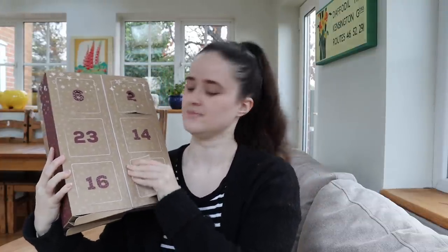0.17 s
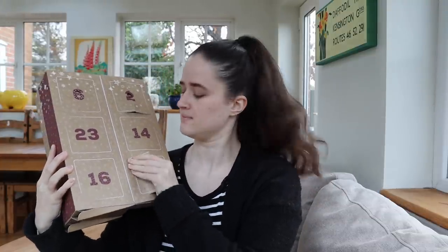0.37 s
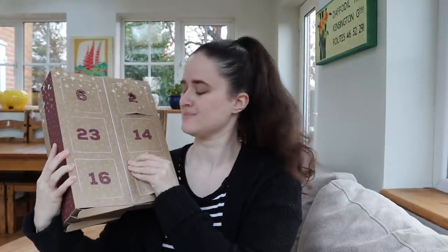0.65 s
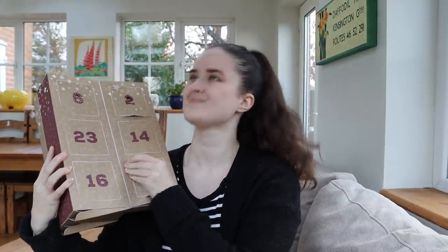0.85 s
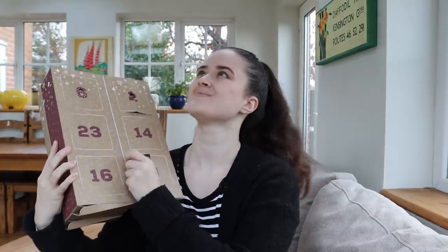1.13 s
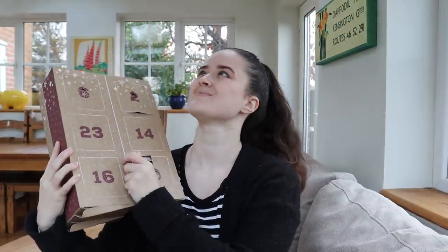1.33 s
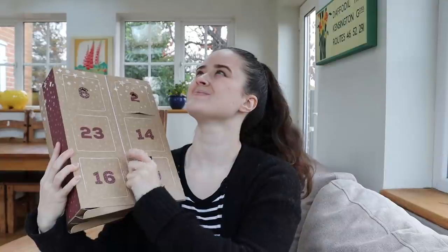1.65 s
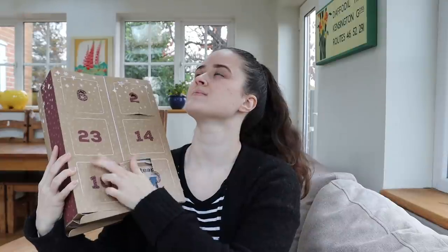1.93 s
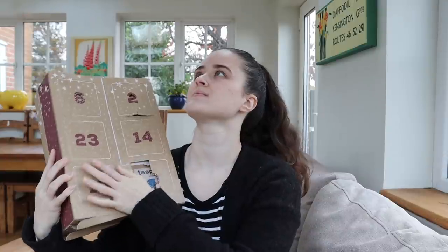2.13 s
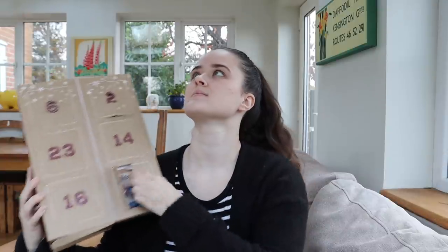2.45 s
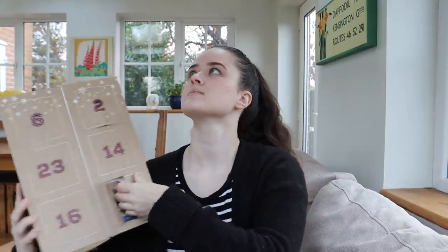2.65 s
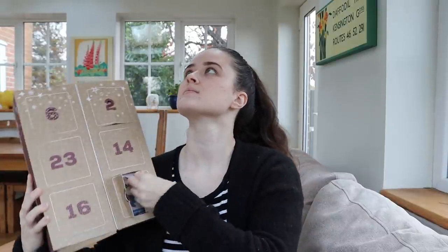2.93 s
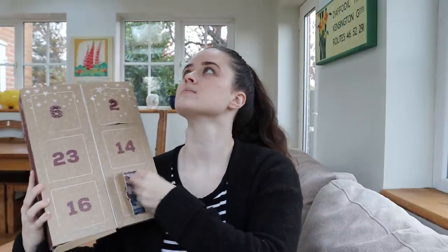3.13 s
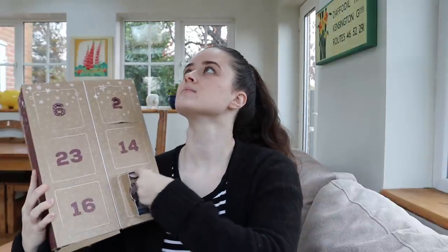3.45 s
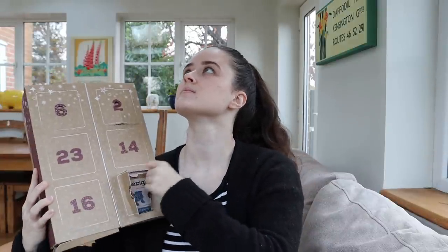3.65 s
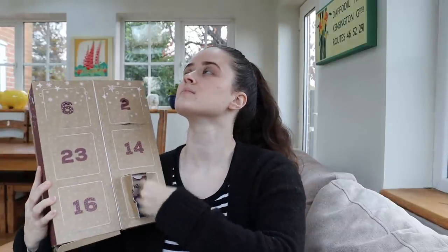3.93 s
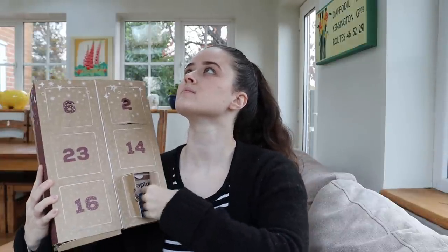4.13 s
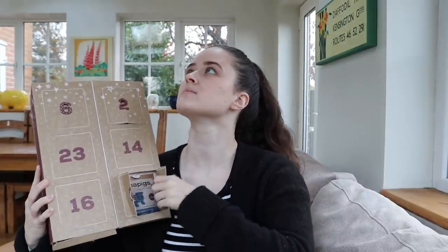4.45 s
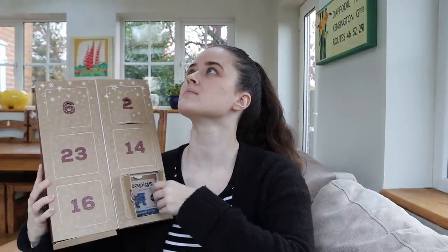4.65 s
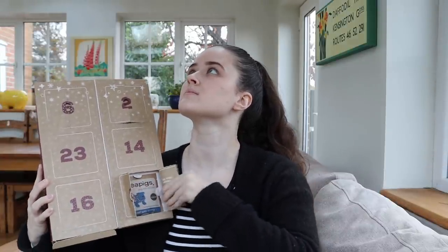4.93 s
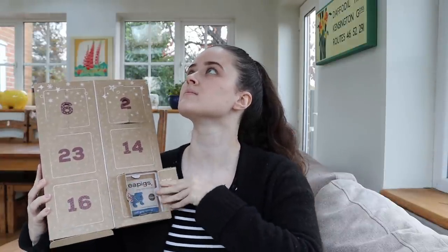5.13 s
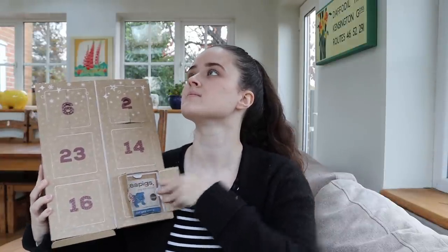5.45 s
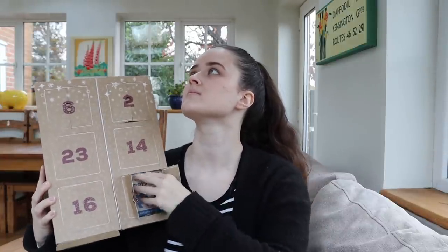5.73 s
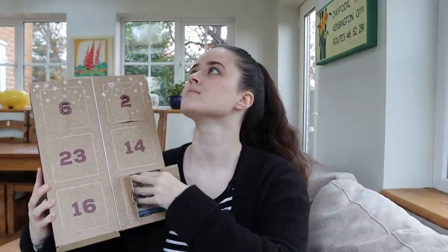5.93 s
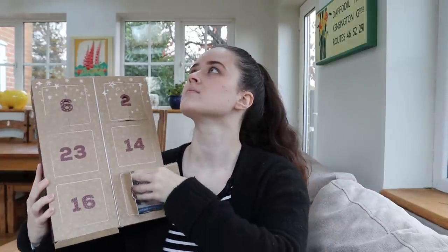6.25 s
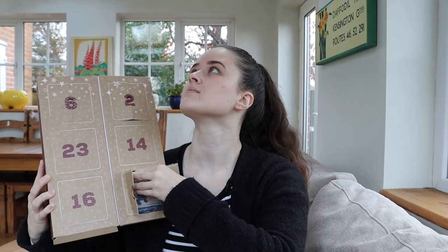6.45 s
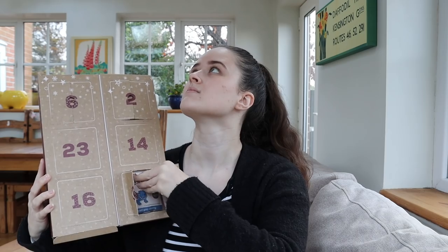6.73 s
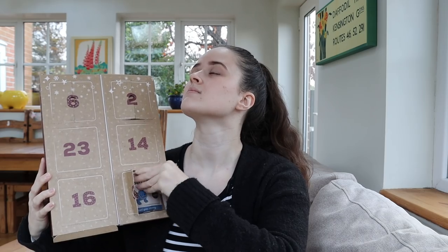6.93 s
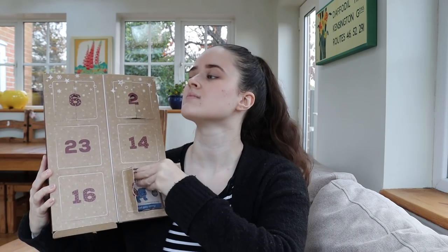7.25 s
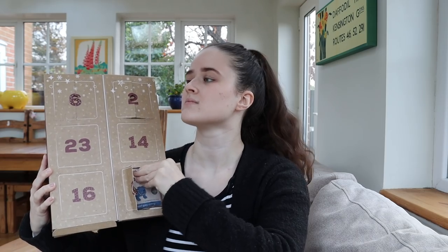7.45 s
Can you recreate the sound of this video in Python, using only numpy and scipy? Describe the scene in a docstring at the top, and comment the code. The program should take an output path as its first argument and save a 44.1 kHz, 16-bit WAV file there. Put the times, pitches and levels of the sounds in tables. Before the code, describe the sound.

Fingers pick at a stuck cardboard flap, with irregular scratching, rubbing and sharp little snaps of card in a room.

```python
"""Fingers pick and prise at a stuck flap of a cardboard box, a metre away in a lively room.
First the fingers rub and tick lightly on the card, a stick-slip friction; near 1 s the nail slips off
the edge and the flap snaps, an impulse that rings the modes of the hollow box. Runs of snaps follow,
with rubbing and quick drags between, hardest near 4.4 s and 4.9 s, then thinning out towards 7.6 s.
After each sound the nearby walls reflect it and the room reverberates for half a second."""
import sys
import numpy as np
from scipy import signal
from scipy.fft import rfft, irfft
from scipy.io import wavfile
from scipy.ndimage import uniform_filter1d

SR = 44100
rng = np.random.default_rng(int(sys.argv[2]) if len(sys.argv) > 2 else 0)


def file_out(sig):
    """Save sig as 16-bit WAV at sys.argv[1]."""
    # one column per channel
    cols = np.atleast_2d(sig).T
    # limit, then scale
    lim = np.clip(cols, -1, 1)
    pcm = np.round(lim * 32767).astype(np.int16)
    wavfile.write(sys.argv[1], SR, pcm)


N = 334278


def gain_of(db):
    """Amplitude ratio of a level in decibels."""
    return 10 ** (np.asarray(db) / 20)


def unit_rms(x):
    """Normalisation to a mean power of 1."""
    return x / np.sqrt(np.mean(x ** 2) + 1e-20)


def unit_energy(x):
    """Normalisation to a total energy of 1."""
    return x / np.linalg.norm(x)


def curve_at(points, hz):
    """Interpolation on a logarithmic frequency axis."""
    f, value = np.transpose(points)
    return np.interp(np.log(hz + 1), np.log(f + 1), value)


def ring(modes, size=3000):
    """Modal superposition: an impulse response is a sum of damped sines."""
    t = np.arange(size) / SR
    sines = (gain_of(db) * np.sqrt(width) * np.exp(-np.pi * width * t) * np.sin(2 * np.pi * hz * t)
             for hz, width, db in modes)
    return unit_energy(sum(sines))


def colour(points):
    """Minimum phase: the most compact causal response with a given spectrum."""
    spectrum_db = np.maximum(curve_at(points, abs(np.fft.fftfreq(4096, 1 / SR))), -100)
    log_response = np.conj(signal.hilbert(np.log(gain_of(spectrum_db))))
    return unit_energy(np.fft.ifft(np.exp(log_response)).real[:1024])


def resonate(x, hz, width_hz):
    """Resonance by heterodyning: shift hz down to zero, smooth, and shift back."""
    carrier = np.exp(2j * np.pi * hz * np.arange(1, len(x) + 1) / SR)
    pole = np.exp(-np.pi * width_hz / SR)
    return 2 * (carrier * signal.lfilter([1 - pole], [1, -pole], x / carrier + 1e-18)).real


def grains(per_s, spread_db):
    """Shot noise: independent clicks of uneven size."""
    odds, sign, size = rng.random((3, N))
    return unit_rms((odds < per_s / SR) * (sign - .5) * gain_of(-spread_db * np.log(size + 0.041)))


# Likeness of left and right in a diffuse field: frequency_hz, coherence (-1 to 1)
COHERENCE = [(60, .98), (300, .93), (700, .7), (1500, .35), (3000, .05), (7000, -.1), (15000, .03)]

def diffuse_pair(a, b):
    """Spatial coherence: long waves reach both microphones alike, short waves independently."""
    coherence = curve_at(COHERENCE, np.fft.rfftfreq(len(a), 1 / SR))
    mid = rfft(a) * np.sqrt((1 + coherence) / 2)
    side = rfft(b) * np.sqrt((1 - coherence) / 2)
    return irfft(np.array([mid + side, mid - side]), len(a))


# Spectrum of the quiet room: frequency_hz, density_db
AIR_SPECTRUM = [(15, -38), (25, 1.5), (70, 6.5), (280, 1), (368, -8.5), (457, -1), (952, 1.5), (1320, -0.5),
                (1930, -6), (3410, -6.5), (9330, -19.5), (14800, -20), (16500, -44)]

def room_tone():
    """Stationary noise: quiet air and microphone hiss."""
    density = gain_of(curve_at(AIR_SPECTRUM, np.fft.rfftfreq(N, 1 / SR)))
    noise = irfft(rfft(rng.standard_normal((2, N))) * density, N)
    return gain_of(-51.5) * unit_rms(diffuse_pair(*noise))


# Reverberation by band: frequency_hz, t60_s, level_db (re direct sound)
REVERB_BANDS = [(120, 0.18, 1), (330, 0.37, 5.5), (854, 0.44, 2.5), (2220, 0.54, 0), (5900, 0.46, -1.5),
                (13000, 0.22, -0.5)]

def reverberant_tail():
    """Absorption: dense reflections decay exponentially, each band at its own rate."""
    hz, t, noise = signal.stft(rng.standard_normal((2, SR)), SR, nperseg=256)
    bands = np.array(REVERB_BANDS)
    decay = gain_of(-60 * t / curve_at(bands[:, :2], hz)[:, None])
    decay /= np.sqrt((decay ** 2).sum(1, keepdims=True) * 128)
    level = gain_of(curve_at(bands[:, ::2], hz))[:, None]
    tail = signal.istft(noise * decay * level, SR, nperseg=256)[1][:, :SR]
    build_up = np.clip((np.arange(SR) / SR - .003) / 0.0065, 0, 1)
    return diffuse_pair(*tail * build_up)


# Echoes from nearby walls and furniture: delay_s, level_db, right_lag_s
WALL_ECHOES = [(.0033, -5.5, -.0001), (.0066, -8.5, 0.0004), (0.0134, -14.5, -0.0006),
               (0.0191, -26.5, -.00015)]

def reflections(x, shift_hz=3.1):
    """Multipath propagation: distinct echoes, then a tail that varies as box and hands shift."""
    early = np.zeros((2, 1024))
    for delay, db, lag in WALL_ECHOES:
        early[[0, 1], [round(delay * SR), round((delay + lag) * SR)]] = gain_of(db)
    out = signal.oaconvolve(x[None], early, axes=1)[:, :N]
    phase = 2 * np.pi * shift_hz * np.arange(N) / SR
    for k in range(4):  # four tails fade into each other
        share = np.maximum(np.cos(phase - k * np.pi / 2), 0)
        out += signal.fftconvolve((x * share)[None], reverberant_tail(), axes=1)[:, :N]
    return out


def follow_through(level_db=-27, t60_s=0.49):
    """Exponential relaxation: rubbing power jumps at each snap and fades as the finger scrapes on."""
    kicks = np.zeros(N)
    for start_s, snap_db, *_ in FLAP_SNAPS:
        kicks[round(start_s * SR)] = gain_of(snap_db + level_db) ** 2
    return signal.lfilter([1], [1, -gain_of(-60 / t60_s / SR) ** 2], kicks)


# Modes of the box, and low modes of its panels: pitch_hz, width_hz, level_db
BOX_MODES = [(563, 38, 17.5), (780, 68, 13), (990, 100, -19), (1032, 27, 9), (1390, 49, 7), (1638, 167, 13),
             (1988, 135, 18.5), (2096, 49, -3.5), (2750, 76, -6), (3250, 400, -28)]
PANEL_MODES = [(136, 19, -4), (213, 39, 0.5), (247, 45, -5), (368.4, 78, 6)]
# Spectra of rubbed card, of the nail's bite, and of skin hiss and ticks: frequency_hz, density_db
CARD_SPECTRUM = [(210, -33.5), (350, -11.5), (662, -6), (942, -3.5), (1400, -6), (1920, -1.5), (2600, -13),
                 (3380, -23.5), (5720, -120)]
NAIL_SPECTRUM = [(1350, -45), (2300, 5), (3160, 1.5), (3500, 4.5), (5200, -6.5), (6760, -37.5),
                 (11400, -120)]
HISS_SPECTRUM = [(2350, -26.5), (4000, -0.5), (4580, -5), (6060, -2), (9450, -9.5), (15000, -13.5),
                 (16000, -16), (16500, -13)]
# Fingers shifting on the card: time_s, pressure_db, hiss_trim_db, rumble_trim_db
FINGER_PRESSURE = [(0, -40, -9, -2.5), (.17, -54, -4, -2), (.29, -45.5, -2.5, -10), (.8, -65, -4, 6),
                   (.93, -58, -13, 3), (1.31, -42.5, -6.5, -16), (1.6, -63, -5, 6), (1.78, -40, -4, -11.5),
                   (2.09, -43.5, -7, 5.5), (2.45, -50, -2, -16), (3.03, -39, -9, 6), (3.36, -43.5, -9, -10),
                   (3.46, -48, -13, -8), (3.57, -42.5, -5.5, 7), (4.05, -44.5, -3, -11),
                   (4.24, -51, -7, -12), (4.7, -46, -3.5, -2.5), (4.9, -47.5, -14, -7),
                   (5.18, -43, -4.5, -18), (5.45, -55.5, -10, -11), (5.7, -36.5, -4, -8.5),
                   (6.28, -57.5, -29, 5.5), (6.9, -56.5, -6.5, 0), (7.12, -45.5, -12, -1),
                   (7.5, -61, -28, 5), (7.58, -44.5, -15, -3)]

def rubbing():
    """Stick-slip friction: fibres catch and let go in dense grains that excite the card and box."""
    times, *columns = np.transpose(FINGER_PRESSURE)
    pressure_db, hiss_db, rumble_db = (np.interp(np.arange(N) / SR, times, c) for c in columns)
    wobble, noise = rng.standard_normal((2, N))
    stutter_db = 1.3 * unit_rms(uniform_filter1d(uniform_filter1d(wobble, 300), 300))
    stroke = np.sqrt(gain_of(pressure_db) ** 2 + follow_through()) * gain_of(stutter_db)
    fibres = grains(per_s=2200, spread_db=4.4) * stroke
    skin = grains(per_s=5000, spread_db=2) * stroke
    body = gain_of(5) * colour(CARD_SPECTRUM) + gain_of(-4.5) * ring(BOX_MODES, size=1024)
    scrape = gain_of(-10.5) * signal.oaconvolve(fibres, body + colour(NAIL_SPECTRUM))
    hiss = signal.oaconvolve(skin * gain_of(hiss_db - 3), colour(HISS_SPECTRUM))
    rumble = signal.oaconvolve(noise * stroke * gain_of(rumble_db - 8), ring(PANEL_MODES))
    return scrape[:N] + hiss[:N] + rumble[:N]


# Quick drags of a nail: middle_s, half_length_s, level_db, pitch_hz, hiss_db (re level)
NAIL_DRAGS = [(0.994, 0.042, -31, 600, -16), (1.14, 0.076, -33.5, 1870, -6.5),
              (1.178, 0.023, -29.5, 1700, -10), (1.206, 0.048, -33, 3000, -9),
              (1.413, 0.035, -42.5, 1900, -6), (1.907, 0.031, -32.5, 1280, -14),
              (2.072, 0.053, -27, 1830, -3.5), (2.336, 0.039, -44, 2260, -2),
              (2.465, 0.0068, -37, 1510, -5), (2.514, 0.053, -38, 1200, -25), (2.84, 0.069, -52, 1300, -8),
              (3.286, 0.032, -47, 1200, 5.5), (3.53, 0.036, -36, 503, -2.5), (4.06, 0.16, -44.5, 1670, 2.5),
              (4.717, 0.069, -33.5, 1880, -14), (5.298, 0.021, -31, 1390, -14.5),
              (5.637, 0.032, -35, 2400, -11), (5.763, .04, -33, 3030, -0.5),
              (6.102, 0.089, -43.5, 1720, -7.5), (6.4, 0.065, -43.5, 950, -1),
              (7.014, 0.042, -29.5, 1280, -17), (7.134, 0.027, -33, 2100, -12.5),
              (7.387, 0.044, -54.5, 1500, -5)]

def drags():
    """Forced vibration: friction grains swell and fade through a broad resonance of the card."""
    out, t = np.zeros(N), np.arange(N) / SR
    fibres = grains(per_s=3500, spread_db=3.8)
    hiss = signal.oaconvolve(grains(per_s=4600, spread_db=1.9), colour(HISS_SPECTRUM))[:N]
    for middle_s, half_s, db, hz, hiss_db in NAIL_DRAGS:
        span = slice(round((middle_s - half_s) * SR), round((middle_s + half_s) * SR))
        swell = np.cos(np.pi / 2 * (t[span] - middle_s) / half_s) ** 2
        width_hz = 0.93 * hz
        rasp = unit_rms(resonate(resonate(fibres[span], hz, width_hz), hz, width_hz))
        out[span] += gain_of(db) * swell * (rasp + gain_of(hiss_db) * hiss[span])
    return out


def slip_force(noise, t, db):
    """Stress release: a ragged pulse; the harder the snap, the longer its rise and shorter its decay."""
    rise_s = 0.00017 * np.exp(0.25 * (db + 15))
    decay_s = np.clip(0.0048 * np.exp(-0.05 * (db + 21.5)), .0003, .02)
    envelope = np.exp(-t / decay_s) * (1 - np.exp(-t / rise_s))
    spectrum = rfft(noise * abs(noise) * envelope, 2048)
    return irfft(spectrum / abs(spectrum) ** 0.41)[:len(t)]  # a flatter spectrum: a clean, toneless click


def flap_response(hz, bends, detune=.04, mode_widening=1.15):
    """Sympathetic resonance: box modes near the flap's pitch ring, detuned a little and widened."""
    modes = [(f * (1 + detune * bend), mode_widening * width, db - 4.3 * np.log2(f / hz) ** 2)
             for (f, width, db), bend in zip(BOX_MODES, bends)]
    flap = ring([(hz, 160 + 0.015 * hz, 0)])
    ringing = gain_of(-0.5) * flap + gain_of(3.5) * ring(modes)
    low_cut = signal.butter(3, 0.7 * hz, "high", fs=SR)  # a small flap radiates little below its pitch
    return signal.lfilter(*low_cut, ringing)


# The nail slips and the card snaps: start_s, level_db, pitch_hz, bite_trim_db, tick_trim_db, thud_trim_db
FLAP_SNAPS = [(0.108, -42.5, 479, 2, -3, -28), (0.246, -37, 640, -20, -16, -8),
              (0.447, -37.5, 2880, -5, -5.5, -28), (.516, -27, 2910, -8, -9, -33),
              (.685, -34.5, 890, -1.5, -22, -9), (.731, -35.5, 2420, -4, -22, -21),
              (.756, -39, 950, 5, -13, -28), (.826, -21.5, 690, -2.5, -16, -5),
              (0.857, -17.5, 4440, -11, -11, -6), (.889, -18, 3100, -3, -10.5, -7),
              (.947, -3, 2080, -8, -23.5, -21.5), (1.06, -21, 1440, -3, -7, -29),
              (1.407, -21, 2960, -5.5, -15, -32), (1.75, -31, 958, 0, -20, -19),
              (1.792, -32, 2520, 1, -29, -28), (1.815, -27, 950, -3, -21, -27),
              (1.83, -23, 907, -5, -31, -28), (1.848, -9, 2300, -3.5, -20.5, -38),
              (1.967, -14.5, 3400, -4, -17.5, -28), (2.005, -19.5, 990, -11, -19, -15),
              (2.204, -30, 540, -9, -32, -25), (2.261, -28.5, 635, -14, -30, -4),
              (2.346, -31, 920, -10, -10.5, -3), (2.469, -11, 1180, -6.5, -21, -45),
              (2.678, -14.5, 2030, -19, -22, -28), (2.802, -27, 804, -10, -21, -23),
              (2.9, -18.5, 1980, -32, -19, -23), (2.955, -15, 2180, -14, -16, -10.5),
              (2.997, -15, 695, -5.5, -17, -9), (3.035, -11, 920, -13, -17.5, -9),
              (3.071, -10.5, 2100, -19, -16.5, -26), (3.332, -22.5, 2100, -15, -28, -31),
              (3.359, -27.5, 1820, -3.5, -21, -14), (3.549, -22, 417, -1.5, -9, 3),
              (3.573, -25, 343, -2, -7.5, -8), (3.621, -12, 570, -15, -20, -17),
              (3.696, -12.5, 764, -7.5, -18, -13), (3.778, -10.5, 1000, -3.5, -17, -45),
              (3.957, -23.5, 2240, -23, -20, -16), (4.005, -22.5, 2750, -6.5, -22, -11),
              (4.064, -22, 2000, -8, -22, -23), (4.117, -23, 840, -5, -26, -34),
              (4.171, -26.5, 1170, -10, -31, -17), (4.266, -14.5, 1990, -25, -22.5, -14.5),
              (4.277, -9.5, 990, -15, -17, -48), (4.302, -13.5, 796, -1, -16.5, -31),
              (4.4205, -2.5, 1000, -22, -22.5, -40), (4.4246, -5, 850, -14, -19.5, -20),
              (4.521, -13, 730, -14, -21, -28), (4.62, -21.5, 1760, -23, -40, -24.5),
              (4.729, -22, 1410, -31, -32, -34), (4.775, -18.5, 1690, -6.5, -21, -32),
              (4.917, -2.5, 1025, -12, -29, -21.5), (4.928, -4, 1160, -18, -21.5, -47),
              (5.05, -23.5, 1240, -25, -22, -20), (5.408, -31.5, 1410, -3.5, -17, -26),
              (5.516, -34.5, 1070, -1.5, -25, -14), (5.617, -21, 2520, -16, -21, -19),
              (5.701, -16.5, 2560, -15, -30, -13), (5.709, -5.5, 2790, -9.5, -31, -17.5),
              (5.72, -12, 1080, -12, -15.5, -34), (5.969, -34.5, 1460, -19, -21, -13),
              (6.324, -32.5, 2180, -3.5, -21, -22), (6.37, -33, 1470, -2, -19, -2),
              (6.396, -20.5, 584, -9, -33, -11), (6.605, -21.5, 1480, -9.5, -19, -8.5),
              (6.892, -41, 714, -5, -20, -16), (6.98, -14, 2000, -4, -31, -28),
              (7.093, -24, 1390, -8, -21.5, -39), (7.55, -32, 1730, -17, -25, -13)]

def snaps():
    """Impulse excitation: each slip rings flap and box, with a crack, nail bite, tick and panel thud."""
    out, t = np.zeros(N + 4096), np.arange(1024) / SR
    card, nail, hiss = colour(CARD_SPECTRUM), colour(NAIL_SPECTRUM), colour(HISS_SPECTRUM)
    panels = ring(PANEL_MODES)
    tick_envelope = np.minimum(t / 0.0006, 1) * np.exp(-t / 0.0031)  # the treble leaves first
    for start_s, db, hz, bite_db, tick_db, thud_db in FLAP_SNAPS:
        noise = rng.standard_normal(len(t))
        force = slip_force(noise, t, db)
        sound = signal.fftconvolve(force, flap_response(hz, bends=noise[::-1]))
        crack = signal.fftconvolve(force, card)
        crack_db = 3.5 - 2.1 * np.log2(hz / 1000) + 0.1 * (db + 15)  # low, hard snaps crack more
        sound[:len(crack)] += gain_of(crack_db) * crack
        sound /= abs(sound).max()
        strength = np.linalg.norm(sound[:600])
        bite = signal.fftconvolve(force, nail)
        tick = signal.fftconvolve(force * tick_envelope, hiss)
        thud = signal.fftconvolve(abs(force), panels)
        for part, part_db in (bite, bite_db + 2), (tick, tick_db + 14), (thud, thud_db + 7):
            sound[:len(part)] += gain_of(part_db) * strength * unit_energy(part)
        at = round(start_s * SR)
        out[at:at + len(sound)] += gain_of(db - 2.5) * sound
    return out[:N]


def scene(right_lag_samples=3):
    """Superposition: the direct sound of the box and its reflections, over the room tone."""
    low_cut = signal.butter(4, 122, "high", fs=SR, output="sos")  # a small box radiates no deep bass
    box = signal.sosfilt(low_cut, snaps() + drags() + rubbing())
    right = np.r_[np.zeros(right_lag_samples), box[:-right_lag_samples]]
    return np.array([box, right]) + reflections(box) + room_tone()


# Balance of the two microphones: frequency_hz, left_minus_right_db
BALANCE = [(60, -1), (180, 0.5), (550, 0), (1650, -2.5), (4970, -2.5), (15000, 0.5)]

def record(dry, ceiling=.97, cutoff_hz=15900):
    """Transduction: a slight lean to the right, soft saturation of the peaks, then a band limit."""
    lean_db = curve_at(BALANCE, np.fft.rfftfreq(N, 1 / SR)) * np.array([[.5], [-.5]])
    leaned = irfft(rfft(dry) * gain_of(lean_db), N)
    rounded = leaned / (1 + abs(leaned / ceiling) ** 6) ** (1 / 6)
    low_pass = signal.firwin(511, cutoff_hz, window=("kaiser", 9), fs=SR)
    return signal.oaconvolve(rounded, low_pass[None], "same")


dry = scene()
out = record(dry)
file_out(out)
```